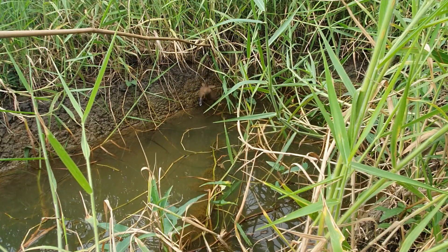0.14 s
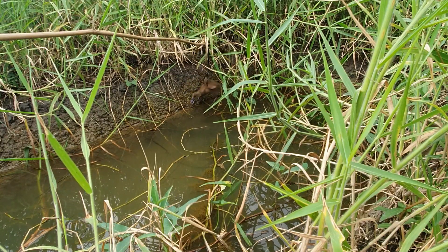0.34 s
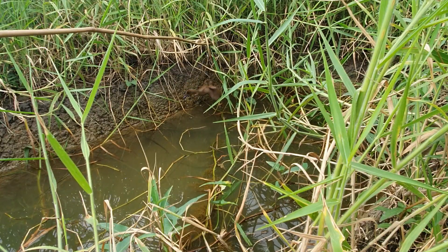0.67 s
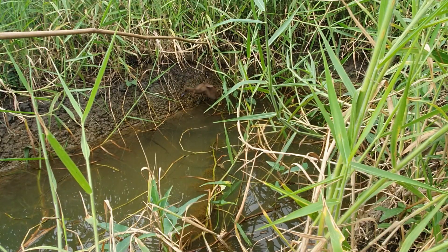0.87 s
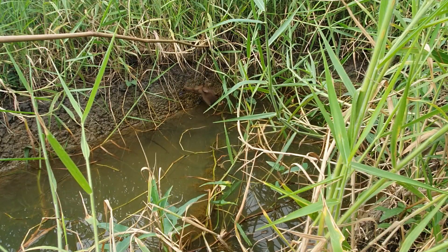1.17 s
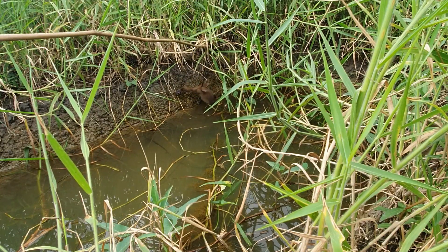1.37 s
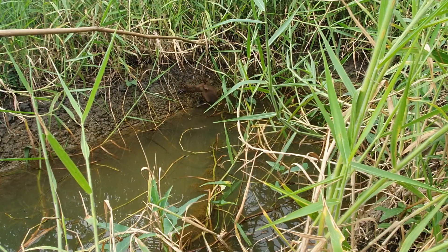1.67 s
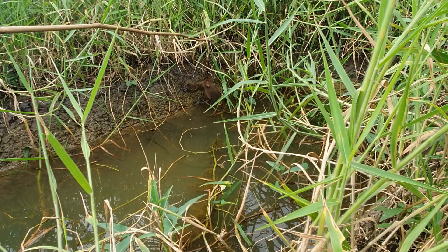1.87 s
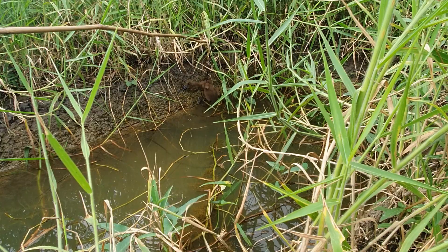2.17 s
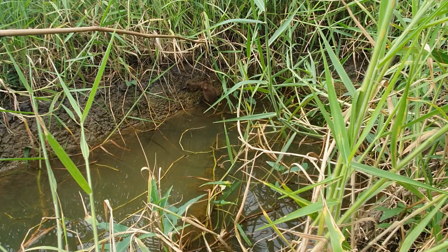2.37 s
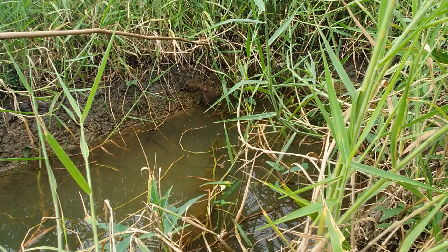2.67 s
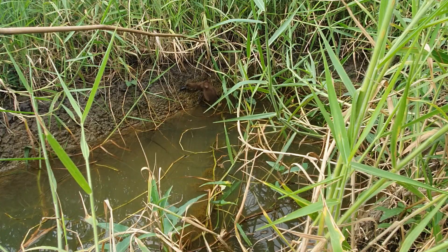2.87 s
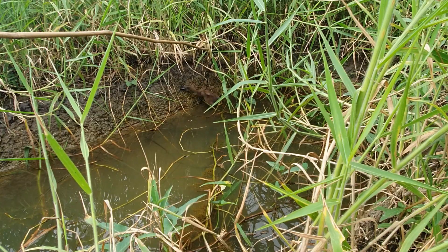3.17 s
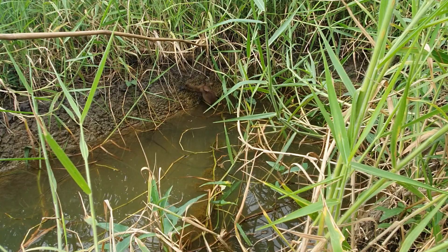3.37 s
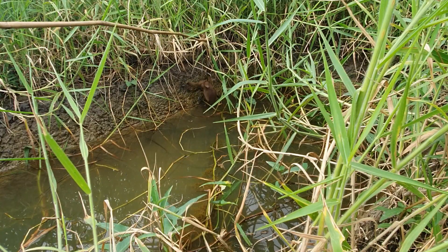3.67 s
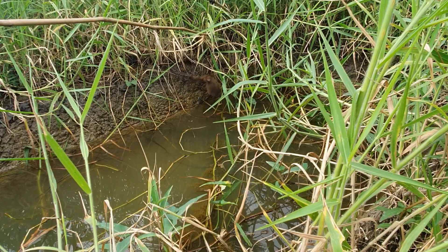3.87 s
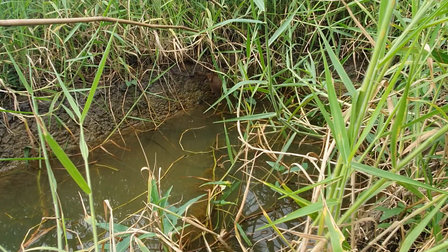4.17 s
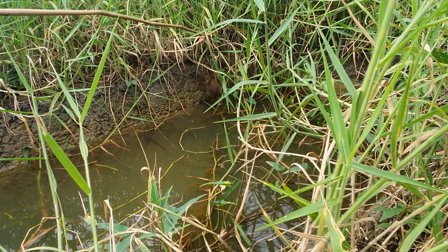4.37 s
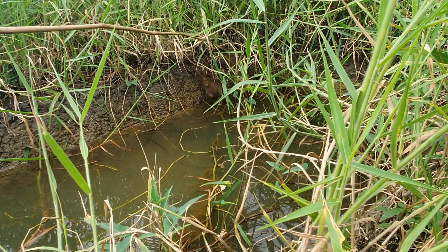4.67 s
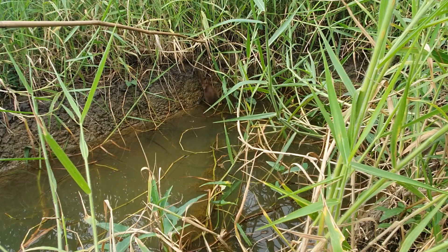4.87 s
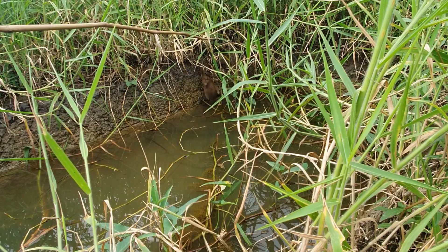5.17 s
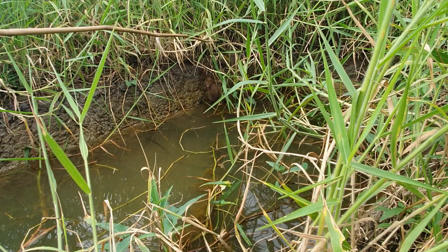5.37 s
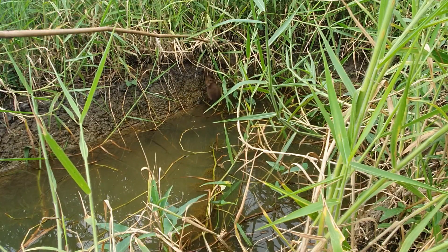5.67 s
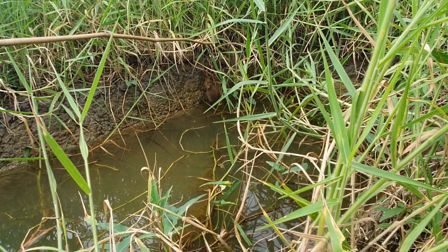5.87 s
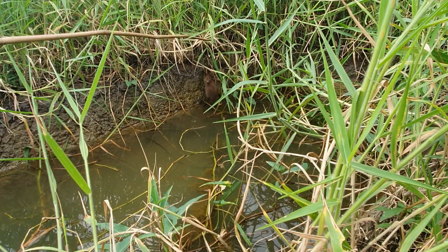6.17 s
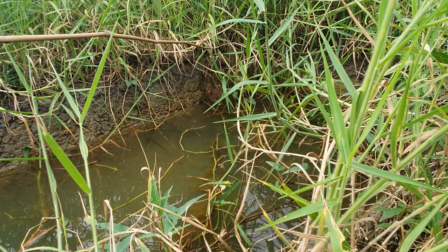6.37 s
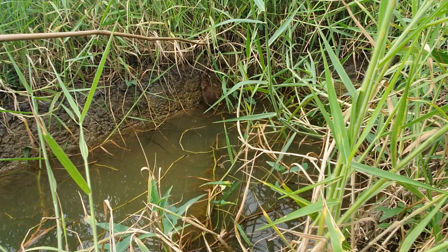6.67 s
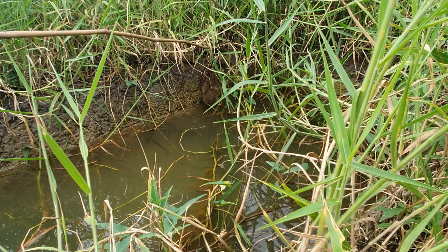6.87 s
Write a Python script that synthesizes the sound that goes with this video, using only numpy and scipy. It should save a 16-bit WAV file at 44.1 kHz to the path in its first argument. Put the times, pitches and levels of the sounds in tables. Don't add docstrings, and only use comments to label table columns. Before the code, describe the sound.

A duckling peeps close to a stereo microphone, mostly to the left, beside an overgrown muddy pond. From 0 to 3 seconds come ten strong, thin whistles around three and a half kilohertz, each under a tenth of a second, spaced about 0.3 seconds apart, with fast glides above the note and a small flick as it shuts. Dry ticks crackle at 2.4 to 3.1 seconds. A gap follows, with faint lower chick chirps near 3.3 to 3.5, then peeps at 3.6 and 4.0. From 4.5 to 5.5 they are weak, soft and slightly breathy, with little snaps; from 5.8 to 6.9 they return stronger but uneven. Small drips or beak pops plink, mainly later. Two tiny falling-note trills come near 6.5 and 6.9. Throughout, a thin cricket pulses about seven or eight times a second, fading and returning, beneath a high insect chorus, leaf hiss, deep distant traffic and barely audible machine hum.

```python
import sys
import numpy as np
from scipy import signal
from scipy.io import wavfile
from scipy.ndimage import uniform_filter1d

SR = 44100
rng = np.random.default_rng(int(sys.argv[2]) if len(sys.argv) > 2 else 0)


def to_linear_factor(level_db):
    exponent = np.asarray(level_db, float) / 20
    return 10 ** exponent


def put_to_file(sound):
    columns = np.atleast_2d(sound).T
    safe = np.clip(columns, -1, 1)
    whole_steps = np.round(safe * 32767)
    wavfile.write(sys.argv[1], SR, whole_steps.astype(np.int16))


N = 310023
T = np.arange(N) / SR


def rms_one(x):
    return x / np.sqrt(np.mean(x ** 2) + 1e-20)


def at_hz(points, hz):
    point_hz, value = np.transpose(points)
    return np.interp(np.log(hz), np.log(point_hz), value)


def band(x, low_hz, high_hz):
    return signal.sosfilt(signal.butter(2, [low_hz, high_hz], "band", fs=SR, output="sos"), x)


def high_pass(x, order, hz):
    return signal.sosfilt(signal.butter(order, hz, "high", fs=SR, output="sos"), x)


def drift(rate):
    r = np.exp(-80 * np.pi * rate / SR)
    slow = signal.lfilter([1], [1, -2 * r, r * r], rng.standard_normal(N // 40 + 2002))[2000:]
    return np.interp(np.arange(N) / 40, np.arange(len(slow)), rms_one(slow))


def add(out, s, sound, pan_db):
    i = max(round(s * SR), 0)
    out[:, i:i + len(sound)] += sound[:N - i] * to_linear_factor(np.array([[pan_db / 2], [-pan_db / 2]]))


def open_air(patchy_db):
    # (frequency [Hz], density [dB per Hz])
    air = [(24, -36.5), (40, -7), (71, -4), (126, -14.5), (301, -27.5), (333, -26.5), (461, -35),
           (797, -27.5), (1080, -35.5), (1250, -33.5), (4570, -42.5), (7910, -54), (8960, -56),
           (15500, -56.5)]
    # (frequency [Hz], left-right correlation [-1 to 1])
    likeness = [(60, 0.97), (130, 0.99), (290, 0.44), (600, -0.52), (1410, -0.61), (3500, 0.027)]
    # (frequency [Hz], left minus right [dB])
    lean = [(700, 0.16), (4400, 2.5), (8100, 3.5)]
    air_db, hum_hz, hum_db = -47, 525, -76.0
    out, edges = 0, 31 * 2 ** np.arange(0, 9.4, 1 / 3)
    white = rng.standard_normal((2, 2, N))
    for k, (low, high) in enumerate(zip(edges, edges[1:])):
        mid, side = band(white[k % 2], low, high)
        hz = np.sqrt(low * high)
        alike = np.clip(at_hz(likeness, hz), -1, 1)
        lean_db = at_hz(lean, hz) * np.array([[.5], [-.5]])
        gain = to_linear_factor(at_hz(air, hz) + patchy_db * drift(0.24) + lean_db)
        out = out + gain * (np.sqrt(1 + alike) * mid + np.sqrt(1 - alike) * side * [[1], [-1]])
    hiss = to_linear_factor(-80.0) * band(white[0], 14000, 16000)
    hum = to_linear_factor(hum_db - 4) * rms_one(band(white[1, 0], hum_hz - 7, hum_hz + 7))
    return to_linear_factor(air_db) * rms_one(high_pass(out, 2, 38)) + hum + hiss


def insects():
    # (time [s], chirps so far [count])
    chirps_so_far = [(0, -.33), (.56, 4), (1.365, 10), (4.09, 31), (5.002, 38), (5.397, 41), (7.03, 54)]
    # (time [s], level [dB])
    cricket_level = [(0, -72), (.5, -67.5), (1.4, -68.5), (1.6, -81.5), (3.2, -78.5), (5.0, -71),
                     (5.2, -82), (5.7, -71), (7.03, -67)]
    cricket_hz, cricket_width_hz, strokes_per_s = 9050, 620, 122
    chorus_hz, chorus_width_hz, chorus_db = 10680, 800, -74
    count = np.interp(T, *np.transpose(chirps_so_far))
    chirp = np.clip(.68 + .55 * np.cos(2 * np.pi * count), 0, 1)
    stroke = .35 + (.5 + .5 * np.cos(2 * np.pi * strokes_per_s * T)) ** 1.5
    noise = rng.standard_normal((2, 2, N))
    wings = (noise[0] + 1.5 * noise[0, 0]) * stroke
    near = rms_one(band(wings, cricket_hz - cricket_width_hz / 2, cricket_hz + cricket_width_hz / 2))
    near = near * chirp * to_linear_factor(np.interp(T, *np.transpose(cricket_level)))
    far = rms_one(band(noise[1], chorus_hz - chorus_width_hz / 2, chorus_hz + chorus_width_hz / 2))
    far = far * to_linear_factor(chorus_db + 1.5 * drift(6))
    return near * to_linear_factor(np.array([[2.5], [-2.5]])) + far * to_linear_factor(np.array([[1.5], [-1.5]]))


def bank(x):
    # (first [s], last [s], level [dB], t60 [s])
    echoes = [
        (.007, .031, -23, .5),
        (.031, .19, -29, .25),
    ]
    t, reply = T[:SR // 5], 0
    for first, last, db, t60 in echoes:
        dying = rng.standard_normal((2, len(t))) * (t > first) * (t < last) * to_linear_factor(-60 * t / t60)
        reply = reply + to_linear_factor(db) * dying / np.sqrt(np.sum(dying ** 2, axis=1, keepdims=True))
    return signal.fftconvolve(x[None], reply, axes=1)[:, :N]


def reeds(x):
    reply = np.zeros((2, SR // 40))
    lags = rng.integers(15, SR // 40, (2, 14))
    for side, lag in zip(reply, lags):
        side[lag] = to_linear_factor(-11.0 - 60 * lag / SR / .1) * rng.choice([-1, 1], len(lag))
    reply[:, 0] = 1
    return signal.fftconvolve(x[None], reply, axes=1)[:, :len(x)]


def note(length_s, start_hz, end_hz):
    count = int(length_s * SR)
    phase = 2 * np.pi * np.cumsum(np.linspace(start_hz, end_hz, count)) / SR
    return np.sqrt(np.hanning(count)) * np.sin(phase)


def far_birds():
    # (time [s], length [s], start [Hz], end [Hz], peak
    # [dB], left minus right [dB])
    chirps = [(3.295, 0.039, 1715, 1950, -54.5, -12.5), (3.455, 0.024, 1570, 1640, -58.5, -14),
              (3.53, 0.037, 1800, 2015, -57, -8), (4.45, 0.21, 2000, 1904, -75, 10),
              (.033, 0.01, 5300, 6000, -52, 8), (4.926, .03, 3350, 1900, -41, 6),
              (.058, .012, 2700, 3400, -44, 8), (.328, .012, 5300, 6000, -54, 8),
              (.602, .012, 4600, 5500, -54, 8), (4.9, .02, 3000, 3050, -52, 8)]
    # (time [s], notes [count], peak [dB])
    trills = [
        (6.541, 5, -59.5),
        (6.885, 6, -58.5),
    ]
    step_s, high_hz, low_hz = .0215, 8000, 7300
    out = np.zeros((2, N))
    for s, length_s, start_hz, end_hz, db, pan_db in chirps:
        add(out, s, to_linear_factor(db) * reeds(note(length_s, start_hz, end_hz))[0], pan_db)
    for s, count, db in trills:
        for k in range(int(count)):
            rise_db = -3.0 * max(3 - k, 0)
            add(out, s + k * step_s, to_linear_factor(db + rise_db) * note(.012, high_hz, low_hz), -1.5)
    return out


def ticks():
    # (time [s], peak [dB], low edge [Hz], high edge [Hz], t60 [s])
    snaps = [(1.216, -48, 3000, 9020, .012), (1.6814, -49, 4000, 7500, .012),
             (2.434, -38.5, 1500, 7000, .014), (2.633, -42, 3900, 6500, 0.016),
             (3.0475, -40.5, 1200, 6500, 0.015), (3.0555, -35.5, 2000, 7400, 0.011),
             (3.4496, -43.5, 1500, 6500, .012), (3.857, -54, 3000, 12000, .012),
             (3.933, -48, 2000, 7000, .012), (4.6875, -43.5, 1500, 5970, 0.034),
             (4.9975, -42, 3900, 7500, .03), (5.0568, -46.5, 2900, 6000, .02),
             (6.386, -37.5, 900, 3500, 0.022), (6.7030, -39, 700, 7000, 0.022),
             (6.710, -40, 3500, 7500, 0.027)]
    out, t = np.zeros((2, N)), T[:SR // 25]
    for (s, db, low_hz, high_hz, t60), crackle in zip(snaps, rng.standard_normal((len(snaps), len(t)))):
        snap = crackle * to_linear_factor(-60 * t / t60) + 4.0 * (t == 0)
        snap = band(band(snap, low_hz, high_hz), low_hz / 2, high_hz + low_hz)
        add(out, s, to_linear_factor(db - 4.0) * snap, 2.0)
    return out


def drips():
    # (time [s], peak [dB], pitch [Hz], ring to die [cycles])
    drops = [(0.934, -42.5, 1435, 32), (3.033, -46.5, 1400, 19), (3.451, -44.5, 1620, 26),
             (4.590, -53, 1880, 25), (5.25, -48, 1860, 30), (5.583, -47.5, 2050, 31),
             (5.898, -40.5, 2540, 16), (6.232, -43.5, 2540, 16), (6.249, -51.5, 1285, 30),
             (6.702, -51.5, 647, 12), (6.876, -41, 2490, 24)]
    out, t = np.zeros((2, N)), T[:SR // 20]
    for s, db, hz, cycles in drops:
        ring = np.sin(2 * np.pi * hz * t * (1 + 2.0 * t)) * to_linear_factor(-60 * t * hz / cycles)
        add(out, s, to_linear_factor(db + 5.0) * ring, 5.0)
    return out


def rasps():
    # (time [s], length [s], centre [Hz], width [Hz], peak [dB])
    leaks = [(4.845, .055, 2300, 840, -55), (4.882, .02, 1800, 230, -54.5), (4.845, .055, 5100, 400, -63.5),
             (4.8, .05, 2300, 730, -59), (5.828, .02, 2850, 1400, -49.5), (4.53, 0.043, 2760, 300, -57),
             (0.36, .015, 2760, 300, -60.5)]
    out = np.zeros((2, N))
    for (s, length_s, hz, width_hz, db), air in zip(leaks, rng.standard_normal((len(leaks), SR // 8))):
        size = int(length_s * SR)
        hiss = rms_one(band(air, hz - width_hz / 2, hz + width_hz / 2))[-size:]
        add(out, s, to_linear_factor(db) * np.sqrt(np.hanning(size)) * hiss, 6.0)
    return out


def steady_side(peep, pitch, first_db, fade_s):
    start, length, swell, full_db, closing_db = peep
    first_hz, entry_hz, full_hz, closing_hz, entry_db = pitch
    scoop_s, scoop_bend = .015, 0.61
    flick_hz, shut_s, shut_db = 121, 0.0027, -30.5
    after_s, after_db, after_loss_db = .026, -21, -7
    end = start + length
    half_hz = first_hz + scoop_bend * (entry_hz - first_hz)
    faded_db = closing_db - 500 * max(fade_s - .004, 0)
    return [(start, first_hz, first_db),
            (start + scoop_s / 2, half_hz, (first_db + entry_db) / 2),
            (start + scoop_s, entry_hz, entry_db),
            (start + max(swell, scoop_s + .002), full_hz, full_db),
            (end - shut_s - fade_s, closing_hz, closing_db),
            (end - shut_s, closing_hz + flick_hz, faded_db),
            (end, closing_hz, closing_db + shut_db),
            (end + shut_s, closing_hz, closing_db + after_db),
            (end + after_s, full_hz, closing_db + after_db + after_loss_db),
            (end + after_s + shut_s, full_hz, -90)]


def gliding_side(peep, pitch, entry, leave, drop_s):
    top_s, top_hz, first_db, top_db, landing_db = entry
    above_hz, rest_db, break_db, leap_hz, last_db = leave
    floor_hz, climb_s, landing_hz, settle_s = 2050, .023, 280, 0.012
    shut_s, flick_s, break_hz = 0.0027, 0.0029, 700
    leap_s, leap_loss_db, sink_s = .007, -13.5, .024
    shut, full_hz = peep[0] + peep[1] - shut_s, pitch[2] + above_hz
    closing_hz = max(full_hz - 124.2, pitch[3] + 59.86)
    settled = min(top_s + drop_s + settle_s, shut - flick_s)
    return [(top_s - climb_s, floor_hz, first_db),
            (top_s, top_hz, top_db),
            (top_s + drop_s, min(full_hz + landing_hz, top_hz), landing_db),
            (settled, full_hz, rest_db),
            (shut - shut_s, closing_hz, rest_db),
            (shut, min(pitch[3] + break_hz, leap_hz), break_db),
            (shut + leap_s, leap_hz, break_db + leap_loss_db),
            (shut + leap_s + sink_s, floor_hz, last_db)]


def whistle(rows, t, smooth_s, wobble):
    s, hz, db = np.transpose(rows)
    pitch = uniform_filter1d(np.interp(t, s, hz), size=int(smooth_s * SR)) * (1 + wobble)
    height = np.interp(t, s, to_linear_factor(db / 2), left=0, right=0) ** 2
    return uniform_filter1d(height, size=44) * np.exp(2j * np.pi * np.cumsum(pitch) / SR)


def steady_whistle(rows, t, wobble, flutter):
    # (time [s], depth [dB], half width [s])
    falters = [(.373, -8, .003), (1.6217, -8, 0.0017), (4.552, -10, 0.0086), (1.267, -5, .002),
               (6.524, -3.5, .003), (5.866, -4, .003), (5.884, -6, .005), (6.1947, -10, .003),
               (6.217, -7, .009), (6.85, -11, .008), (5.508, -13, 0.012), (4.012, 0, 0.0072),
               (4.4, -4.5, .012)]
    firm_db, shaky_range_db = -24, 16
    s, _, db = np.transpose(rows)
    shaky = np.clip((firm_db - np.interp(t, s, db)) / shaky_range_db, 0, 1)
    low = whistle(rows, t, .003, (.0007 + .005 * shaky) * wobble) * flutter ** (.6 * shaky)
    low = low * np.clip((t - rows[0][0]) / .012, 0, 1)
    return low * to_linear_factor(sum(depth * np.exp(-((t - mid) / width) ** 2) for mid, depth, width in falters))


def gliding_whistle(rows, t, haste, halo_db, wobble, flutter, grain):
    begin, top = rows[0][0], rows[1][0]
    high = whistle(rows, t, 0.007, (.003 + .012 * haste) * wobble) * flutter ** (.2 + 0.8 * haste)
    high = high * (1 + to_linear_factor(halo_db) * (0.08 + haste) * grain) / np.sqrt(1 + to_linear_factor(2 * halo_db) * haste)
    climb = np.clip((t - begin) / (top - begin), 0, 1)
    high = high * to_linear_factor(-11 * np.sin(np.pi * climb ** .8) ** 2)
    return high * np.clip((t - begin) / 0.0023, 0, 1)


def throat(low, high, apart_hz, flutter, overtone_db, third_db, mirror_db):
    height = abs(low) + abs(high) + 1e-9
    low_turn, high_turn = low / (abs(low) + 1e-9), high / (abs(high) + 1e-9)
    drive = to_linear_factor(overtone_db) * np.sqrt(height / height.max()) * ((low + high) / height) ** 2
    upper = to_linear_factor(third_db) * low_turn ** 3 + to_linear_factor(-51.5) * low_turn ** 4
    drive += upper * abs(low) / height * flutter
    beat = high_turn * np.conj(low) / height * np.exp(-(apart_hz / 700) ** 2)
    mirror = to_linear_factor(-15) * low * np.conj(beat) * abs(high) / height
    mirror = mirror + to_linear_factor(-12.5) * high * beat * (1 + .5 * beat)
    mirror = to_linear_factor(mirror_db) * mirror
    mirror += high * (to_linear_factor(-25.5) * low / height + to_linear_factor(-34.5) * high_turn)
    return low + reeds(high + mirror) + height * drive


def duckling():
    # (start [s], length [s], swell [s], full level at left [dB], closing level at left [dB])
    peeps = [(0.059, .076, 0.024, -12, -13), (0.35, .069, 0.025, -11, -12), (0.614, .095, .04, -14.5, -16),
             (0.939, .074, 0.029, -13.5, -11), (1.25, .074, 0.024, -12.5, -9.5),
             (1.555, .071, 0.038, -18, -13), (1.862, .071, 0.037, -13, -11), (2.161, .065, .023, -14, -14),
             (2.477, 0.074, 0.044, -16.5, -17.5), (2.85, 0.089, 0.06, -16, -17),
             (3.562, 0.088, .05, -17, -16.5), (3.993, 0.09, .056, -18, -21.5), (4.5, .091, .03, -31.5, -33),
             (4.831, .096, 0.067, -39.5, -32.5), (5.159, 0.097, 0.059, -33, -31.5),
             (5.484, 0.096, .058, -24.5, -29), (5.837, .062, 0.035, -14.5, -14.5),
             (6.157, 0.08, 0.032, -19.5, -18.5), (6.482, .082, 0.042, -10.5, -8.5),
             (6.801, .076, 0.028, -21.5, -13)]
    # (first [Hz], after the scoop [Hz], full [Hz], closing [Hz], level after the scoop [dB])
    pitches = [(3300, 3560, 3510, 3480, -24), (3300, 3570, 3612, 3660, -25), (3370, 3320, 3307, 3370, -25),
               (3450, 3520, 3498, 3595, -18.5), (3660, 3450, 3437, 3495, -17.5),
               (3460, 3480, 3420, 3410, -29), (3480, 3490, 3420, 3400, -23.5),
               (3400, 3540, 3575, 3580, -21.5), (3300, 3485, 3520, 3550, -24.5),
               (2900, 3250, 3350, 3360, -39), (2050, 2980, 3233, 3310, -33.5),
               (2596, 3030, 3392, 3400, -45), (1896, 2930, 3150, 3400, -37.5),
               (2200, 3115, 3500, 3360, -46.5), (2050, 3160, 3360, 3345, -42),
               (2200, 3350, 3390, 3350, -48), (3450, 3550, 3450, 3390, -23), (3060, 3145, 3200, 3270, -24),
               (2000, 3037, 3120, 3110, -32), (3300, 3280, 3270, 3280, -30.5)]
    first_breaths = [-36.5, -25, -36, -35.5, -30.5, -38, -29.5, -32, -20, -50, -45, -43.5, -24.5, -25, -27,
                     -29, -30, -39, -31, -42.5]
    # (top time [s], top [Hz], first breath [dB], top level [dB], landing [dB])
    entries = [(0.057, 6500, -35.5, -47, -37.5), (.347, 6100, -43, -39.5, -24.5),
               (.622, 5620, -45.5, -37, -28.5), (.933, 5350, -44, -39, -31), (1.247, 5010, -46, -39, -28.5),
               (1.552, 6560, -49, -56, -38), (1.856, 5580, -43.5, -57.5, -36.5),
               (2.16, 5780, -44.5, -48.5, -30), (2.471, 5850, -45, -47.5, -33.5),
               (2.868, 4840, -80, -49, -35.5), (3.572, 3756, -82, -45.5, -37),
               (4.025, 4185, -41.5, -47, -40), (4.533, 3750, -79, -45, -35), (4.9, 4370, -80, -49, -45),
               (5.203, 4070, -79, -50, -50.5), (5.512, 4280, -82, -67, -52), (5.829, 5180, -39, -54, -31),
               (6.16, 4200, -41.5, -60, -33), (6.498, 3700, -76, -66, -40), (6.8, 5160, -38, -50, -36)]
    # (above the note [Hz], rest [dB], break [dB], second top [Hz], last breath [dB])
    breaks = [(79, -64, -35, 6560, -33.5), (57.9, -54.5, -26, 6545, -46), (400, -24, -30, 5220, -40),
              (50, -60, -28.5, 5510, -44.5), (100.1, -71, -32.5, 6200, -43), (150.5, -38.5, -42, 5300, -43),
              (300.4, -40.5, -39.5, 9200, -69), (620, -30, -35, 7210, -49.5), (376, -27, -37, 7100, -65),
              (454, -29.5, -38, 6040, -77), (561, -31, -42, 6024, -72.5), (652, -32.5, -46.5, 6660, -85),
              (700, -52, -52, 4300, -44), (250, -43.5, -44, 3300, -70), (198, -54, -63, 6160, -80),
              (206, -55.5, -48.5, 5000, -77), (300, -50, -38.5, 6710, -68), (200, -44, -46, 6430, -79),
              (431, -61, -45, 6300, -73), (150, -48, -51.5, 4600, -60)]
    # (second harmonic re note [dB],
    # early left minus right [dB], early turn of the right [rad], late left minus right [dB], late turn of the
    balances = [(-41.5, 8, -1.1, 6, -1.6), (-44, 10, -1.1, 7, -1.5), (-18, 10, -2.5, 8, -1.34),
                (-38.5, 6.5, -1.2, 7.5, -1.3), (-41.5, 9, -1.2, 11.5, -1.5), (-24.5, -2, -0.3, 7.5, 1.14),
                (-23, 8, -.3, 17.5, -1), (-33.5, 14.5, -1.2, 16, -1), (-30.5, 0.5, -1.6, 11, -2),
                (-36, 13, 0, 6.5, -0.2), (-29, 10.5, -1.6, 16, -1), (-26.5, 12, -1.6, 9.5, 0.2),
                (-27.5, 5, 0.1, 7, -1.4), (-26, 10, -1, 6, -0.3), (-28.5, 4.5, 0.3, 3, -.2),
                (-33, 7, 0.5, 9.5, 0.9), (-36, 2, 0, 9, -1.7), (-28, 0.4, 0.1, -2.5, -1.5),
                (-34, 9, -0.1, 7, -.05), (-35, 12, -1, 9, -2)]
    # (third harmonic re note [dB], drop of the glide [s], mirror tones [dB], halo [dB],
    # fade before the flick [s])
    strains = [(-66, .018, -3, -8, .004), (-62, .022, -2.5, -8, .004), (-43, 0.022, 4, -10, .004),
               (-56, .018, -3, -8, .004), (-58, 0.013, -3, -8, .004), (-40.5, .02, 0.5, -6, 0.0036),
               (-46.5, .018, 0.5, -6, .012), (-52, .026, 6, -9, 0.0074), (-52, .022, 6, -9, .012),
               (-54, .018, 6, -10, .008), (-42.5, .018, -1, -10, 0.0076), (-37, 0.0181, 3, -10, .008),
               (-52, .018, 3, -10, 0.0063), (-50, 0.0141, 3, -8, .006), (-52, 0.017, -2, -4, 0.0056),
               (-52, .018, .1, -6, .006), (-56, .026, 4, -2, .008), (-54, .026, 2, -2, .004),
               (-57, .018, 2, -5, 0.0053), (-56, .022, 5, -6, .004)]
    out, wobble, flutter = np.zeros((2, N)), drift(130), to_linear_factor(4.0 * drift(150))
    breath = band(band(rng.standard_normal((2, N)), 2700, 6820), 2000, 7500)
    thin_air = band(rng.standard_normal((2, N)), 10000, 17000)
    grain = rms_one(band(breath[0] * np.cos(2 * np.pi * 4000 * T), 125, 500))
    for peep, pitch, first_db, entry, leave, balance, strain in zip(
            peeps, pitches, first_breaths, entries, breaks, balances, strains):
        third_db, drop_s, mirror_db, halo_db, fade_s = strain
        overtone_db, early_db, early_turn, late_db, late_turn = balance
        steady = steady_side(peep, pitch, first_db, fade_s)
        glide = gliding_side(peep, pitch, entry, leave, drop_s)
        start, end = peep[0], peep[0] + peep[1]
        span = slice(round((start - .05) * SR), round((end + .05) * SR))
        t = T[span]
        steady_hz = np.interp(t, *np.transpose(steady)[:2])
        glide_hz = np.interp(t, *np.transpose(glide)[:2])
        haste = uniform_filter1d(np.clip(abs(np.gradient(glide_hz)) / 3.4, 0, 1), size=200)
        low = steady_whistle(steady, t, wobble[span], flutter[::-1][span])
        high = gliding_whistle(glide, t, haste, halo_db, wobble[::-1][span], flutter[span], grain[span])
        voice = throat(low, high, glide_hz - steady_hz, flutter[span], overtone_db, third_db, mirror_db)
        shut = (t > end - .005) * to_linear_factor(-60 * np.maximum(t - end + .005, 0) / .04) * abs(low).max()
        leak = to_linear_factor(-5.0) * abs(high) * haste * (glide_hz / 4500) ** 2.8
        hiss = breath[:, span] * (leak + to_linear_factor(-33.5) * shut)
        height = abs(low) + abs(high) + 1e-9
        thin = height + 5.4 * abs(high) * (glide_hz / 4500) ** 2
        hiss += thin_air[:, span] * to_linear_factor(-49.0) * thin
        at = [.7 * start + .3 * end, .25 * start + .75 * end]
        lean = to_linear_factor(-np.interp(t, at, [early_db, late_db]))
        turn = np.exp(1j * np.interp(t, at, [early_turn, late_turn]))
        out[0, span] += voice[0].real + hiss[0]
        out[1, span] += lean * ((voice[1] * turn).real + hiss[1])
    return high_pass(out, 4, 1500)


def scene():
    near = duckling() + drips() + ticks() + far_birds() + rasps()
    return near + bank(near.mean(axis=0)) + insects() + open_air(patchy_db=1.45)


def top_cut(x):
    return signal.sosfilt(signal.butter(12, 15740, fs=SR, output="sos"), x)


def record(dry):
    mix = signal.sosfilt(signal.ellip(12, .5, 70, 15760, fs=SR, output="sos"), dry)
    return top_cut(mix)


dry = scene()
out = record(dry)
put_to_file(out)
```